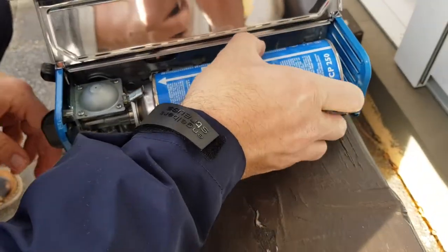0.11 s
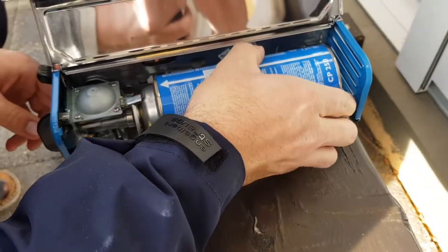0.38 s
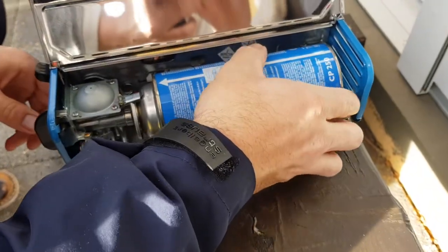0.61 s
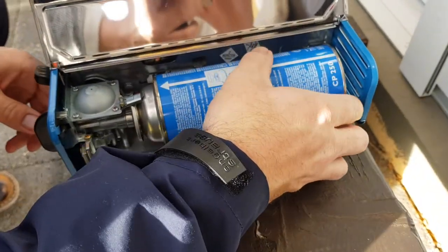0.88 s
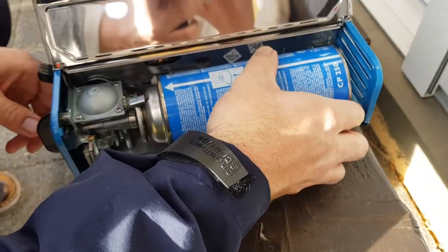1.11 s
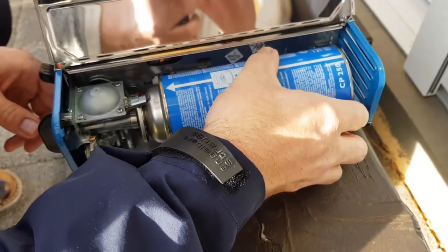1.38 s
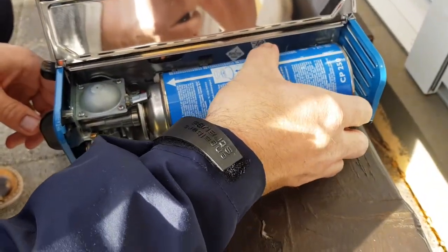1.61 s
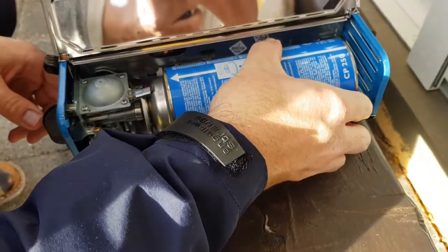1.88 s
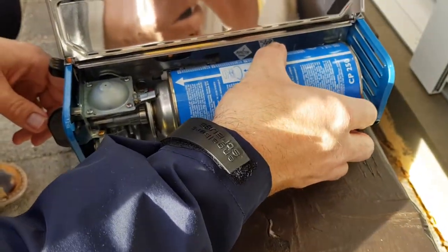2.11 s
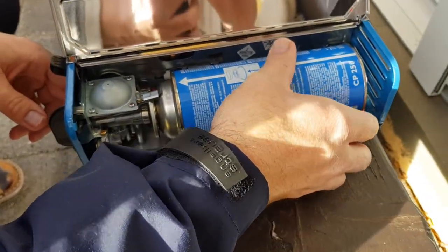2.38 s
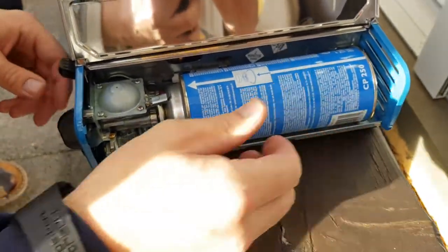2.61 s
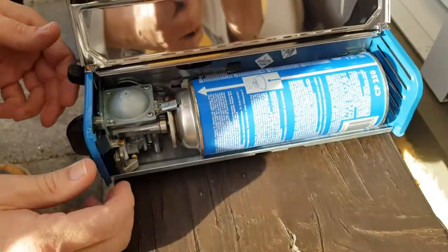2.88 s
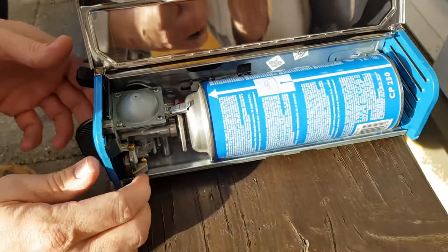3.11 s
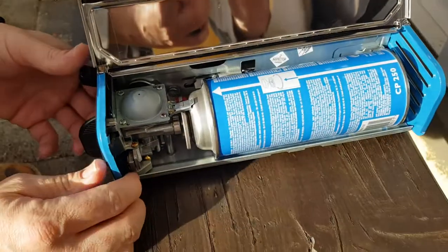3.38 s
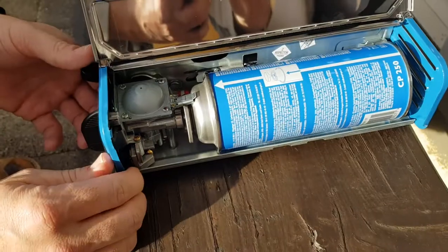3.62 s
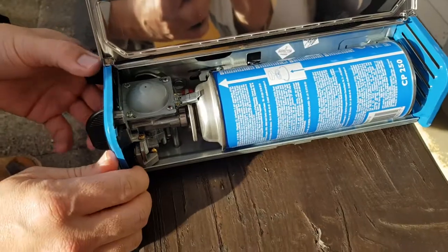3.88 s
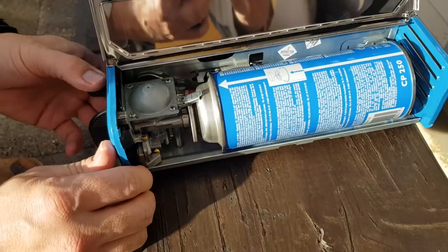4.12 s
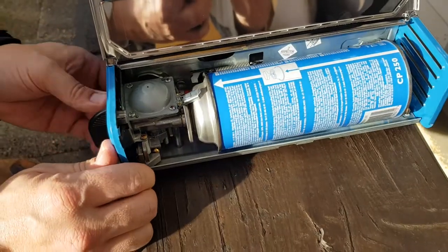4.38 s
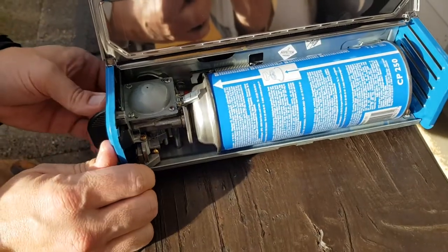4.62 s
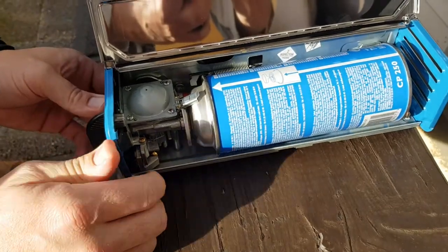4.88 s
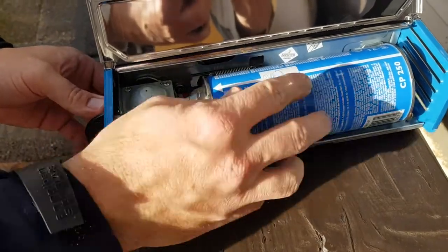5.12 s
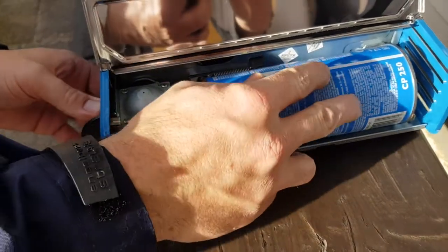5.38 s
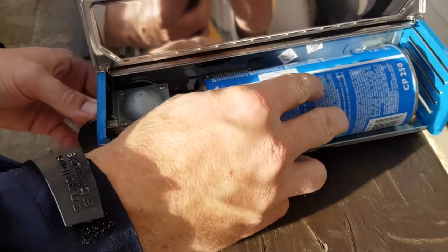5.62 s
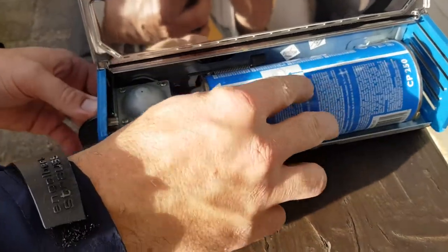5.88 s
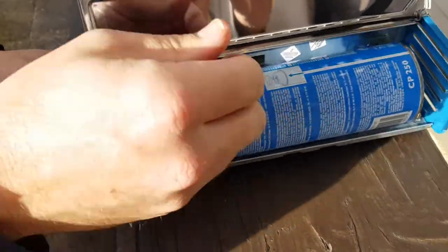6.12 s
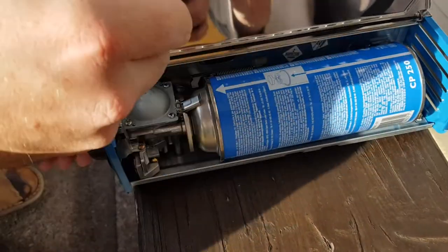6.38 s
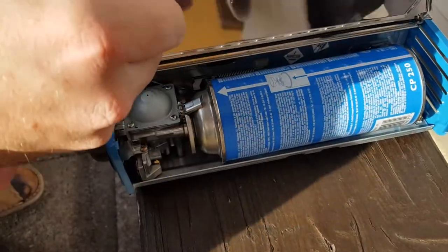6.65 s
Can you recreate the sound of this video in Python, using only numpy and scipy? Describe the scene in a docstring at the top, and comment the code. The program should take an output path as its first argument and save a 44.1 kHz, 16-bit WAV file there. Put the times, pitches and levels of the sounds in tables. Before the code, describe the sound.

A gas can clicks and knocks in a thin metal stove housing outdoors, a brief squeak, cloth rustling, and wind buffeting the microphone.

```python
"""Outdoors, close to a camping stove: a gas cartridge knocks in its sheet-metal housing, then a lever locks it.
Bursts of noise clatter plus ringing modes sound can and housing; a stick-slip tone squeaks, and scrapes and
a shifting grip are noise shaped by the metal's modes. A jacket sleeve, two layers of cloth noise, leads on the left.
Low noise in gusts buffets the two spaced microphone ports, each in its own way, over a distant hush."""
import sys
import numpy as np
from scipy import signal
from scipy.fft import rfft, irfft, next_fast_len
from scipy.io import wavfile
from scipy.ndimage import uniform_filter1d, map_coordinates

SR = 44100
rng = np.random.default_rng(int(sys.argv[2]) if len(sys.argv) > 2 else 0)


def ratio(d):
    """dB to gain"""
    e = np.asarray(d, float) / 20
    return 10 ** e


def put_to_file(sound):
    """Save the sound as 16-bit audio at rate SR, in the file named by the first command-line argument."""
    columns = np.atleast_2d(sound).T  # one column per channel
    safe = np.clip(columns, -1, 1)
    whole_steps = np.round(safe * 32767)
    wavfile.write(sys.argv[1], SR, whole_steps.astype(np.int16))


N = 298116

# ringing modes of the gas can: (frequency [Hz], relative level [dB], typical t60 [s])
CAN_MODES = [(518.4, -4.5, .3), (616, -4, 0.42), (786, -15, 0.19), (1330, -8.5, 0.53), (1364, -13.5, .4),
             (2042, 2, 0.05), (2290, -3, 0.13), (2800, -2.5, 0.14), (3300, -7, 0.11), (4630, -14, 0.06),
             (7960, -4, 0.069)]
# ringing modes of the sheet-metal housing: (frequency [Hz], relative level [dB], typical t60 [s])
HOUSING_MODES = [(398, -5.5, 0.52), (500, -0.5, 0.12), (807, -13.5, 0.43), (907, -8.5, 0.66),
                 (1128, 0, 0.5), (1193, -3.5, 0.3), (1303, -7, 0.61), (1242, -5.5, 0.24), (1714, 0, 0.15),
                 (2179, -8, 0.14), (2660, -10, 0.041), (5200, -4.5, 0.042), (5900, -5.5, .08),
                 (6542, -1.5, 0.054)]
# dip and peak of the microphone ports: (frequency [Hz], gain [dB])
PORT_RESPONSE = [(6000, 0), (9000, -2.5), (11000, 2.5), (13200, 9), (15800, 0.5)]
PORT_GAP = 19 / 44100  # travel time between the ports, s


def unit(x):
    """Bring to rms 1."""
    return x / np.sqrt(np.mean(x ** 2) + 1e-20)


def along(points, hz):
    """(Hz, value) points read on a log axis."""
    f, v = np.transpose(points)
    return np.interp(np.log(hz + 1), np.log(f + 1), v)


def curves(rows):
    """One value per sample for each column after the time."""
    s, *cols = np.transpose(rows)
    return [np.interp(np.arange(N) / SR, s, c) for c in cols]


def wobble(rate):
    """A smooth random curve, rate knots a second."""
    return map_coordinates(rng.standard_normal(int(N * rate / SR) + 4), [np.arange(N) * rate / SR])


def filtered(x, response):
    """x filtered by a complex response of frequency."""
    m = next_fast_len(N + 8192)
    hz = np.fft.rfftfreq(m, 1 / SR)
    return irfft(rfft(x, m) * response(hz), m)[..., :N]


def pair(gain, alike, lead=0):
    """Stereo noise of rms 1 with a colour, a likeness of the sides and a lead of the left side in s."""
    turn = lambda hz: np.arccos(np.clip(alike(hz), 0, 1)) / 2
    spread = lambda hz: gain(hz) * [np.cos(turn(hz)), np.sin(turn(hz))]
    mid, side = filtered(rng.standard_normal((2, N)), spread)
    shift = lambda hz: np.exp(1j * np.pi * lead * np.outer([1, -1], hz))
    return unit(filtered(np.array([mid + side, mid - side]), shift))


def modal(f, lift, width):
    """Noise in the metal is lifted near the modes of can and housing; the peaks widen with pitch."""
    return 1 + sum(lift * ratio(db) / (1 + ((f - hz) / (width * hz)) ** 2)
                   for hz, db, t60 in CAN_MODES + HOUSING_MODES)


def crowded(spacing_hz):
    """A random curve over frequency for the countless close modes of thin plates."""
    knots = rng.standard_normal(int(SR / 2 / spacing_hz) + 4)
    return lambda f: map_coordinates(knots, [f / spacing_hz])


def air():
    """A smooth, distant hush: steady noise, separate at each port."""
    # far outdoor hush: (frequency [Hz], density [dB per Hz])
    hush = [(150, -97), (300, -99), (1000, -102), (2500, -113), (3600, -118), (5500, -114), (8500, -114),
            (13000, -108), (16000, -110)]
    per_hz_db = np.log10(SR / 2) * 10  # the white noise spreads over SR / 2
    return filtered(rng.standard_normal((2, N)), lambda f: ratio(along(hush, f) + per_hz_db))


def wind():
    """Eddies thump each port in lumps, partly pushing one while pulling the other; the strongest turn sharp."""
    # wind between the gusts: (time [s], level [dB], left over right [dB])
    breeze = [(0, -56, -8), (.13, -48, 21), (.24, -44, 6), (.7, -53, -2), (1.05, -54.5, 5.5),
              (1.3, -46, -28), (1.65, -51, -27), (2.3, -46.5, -13), (2.6, -52, -17), (2.86, -55, -25),
              (3.25, -47, -2), (3.44, -50, 21), (3.82, -49.5, -6.5), (4.15, -54.5, -14), (4.6, -54, -6),
              (4.9, -49.5, -1), (5, -62, -26), (5.2, -51.5, -9.5), (5.72, -42, 5.5), (5.88, -67, -15),
              (6.25, -51, -27), (6.42, -45, -27.5), (6.6, -56, -5), (6.76, -63, -21)]
    # gusts that thump the ports: (time [s], peak level [dB], half length [s], left over right [dB])
    gust_list = [(0.329, -31, 0.041, -2.5), (0.463, -42, 0.07, -3), (0.628, -33.5, .05, 2.5),
                 (0.766, -20, 0.012, 0), (0.902, -41, 0.07, -18), (1.193, -42, 0.073, -15),
                 (1.37, -44, 0.062, 11), (1.524, -35, .04, -2), (1.735, -37.5, 0.025, -4),
                 (1.854, -37.5, 0.059, -15), (1.914, -33.5, 0.017, 7), (1.992, -37.5, .04, 1),
                 (2.139, -30.5, 0.036, -15), (2.213, -34, 0.065, -3), (2.507, -38.5, 0.046, -2.5),
                 (2.702, -50, 0.041, 3), (3.114, -32, 0.078, -2.5), (3.353, -37.5, 0.036, -8),
                 (3.668, -33.5, 0.052, -1), (3.915, -29, 0.02, 15), (3.98, -31, 0.046, -0.5),
                 (4.31, -40.5, 0.037, 2.5), (5.074, -39, 0.049, -11.5), (5.326, -39, 0.036, -2),
                 (5.559, -35, 0.088, -1), (6.04, -39.5, 0.078, -25.5), (6.183, -41.5, .04, -8),
                 (6.343, -33, 0.016, -8.5), (6.497, -29.5, 0.046, -5.5), (6.681, -40, 0.028, -2)]
    # colour of the buffeting: (frequency [Hz], relative level [dB])
    buffet = [(15, -36), (30, -14), (45, 0.5), (62, 1), (100, -4.5), (150, -14), (250, -28), (500, -47.5),
              (1000, -75.5)]
    fall_db = 9  # fall one half length from the gust's peak
    t = np.arange(0, N + 64, 64) / SR
    breeze_db, lean_db = curves(breeze)
    power = lambda db, pan_db: ratio(2 * db) / (1 + ratio(2 * np.array([[-1], [1]]) * pan_db))
    gusts = sum(power(db - fall_db * np.abs(t - s) / half, pan_db) for s, db, half, pan_db in gust_list)
    gusts = [np.interp(np.arange(N) / SR, t, port) for port in gusts]
    steady = power(breeze_db + 2.5 * wobble(7.5), lean_db + 6 * wobble(8.1))
    force = np.sqrt(steady + gusts)

    lumps = ratio(4.5 * np.array([wobble(25), wobble(25)]))
    eddies = rng.standard_normal((2, N))
    push = unit(filtered(lumps * (eddies - 0.14 * eddies[::-1]), lambda f: ratio(along(buffet, f))))
    slow = uniform_filter1d(uniform_filter1d(push ** 2, size=4000), size=4000)
    push = unit(push / (np.abs(slow) + .05) ** 0.97)  # lumps stay, the slower drift is left to the gusts
    edge = unit(filtered(push * np.abs(push), lambda f: f / (f + 300)))
    sharp = unit(push + 0.042 * edge)
    flutter_level = ratio(-23.5 + 7 * np.array([wobble(42), wobble(45)]))
    flutter = flutter_level * pair(lambda f: 1 / (1 + ((f - 260) / 130) ** 2), lambda f: 0 * f)
    return force * (sharp + flutter)


def sleeve():
    """Cloth rubs on cloth on the left; fine grain is shared, slower folds differ between the layers."""
    # speed of the sleeve, as the level of its fine hiss: (time [s], level [dB])
    speed = [(0, -54.5), (.3, -56.5), (.8, -62), (1, -54.5), (1.22, -62), (1.6, -66.5), (2.06, -74),
             (2.1, -62), (2.15, -65), (2.27, -55.5), (2.32, -56.5), (2.48, -51), (2.52, -45), (2.65, -37.5),
             (2.72, -40.5), (2.76, -39.5), (2.82, -46.5), (2.94, -47), (3, -40), (3.24, -39), (3.4, -44.5),
             (3.67, -52), (4, -60), (4.3, -58.5), (4.7, -67), (4.82, -60), (4.95, -45.5), (5.03, -53),
             (5.08, -50.5), (5.21, -62), (5.8, -70), (5.98, -60.5), (6.15, -59.5), (6.41, -61.5),
             (6.56, -56.5), (6.69, -52), (6.76, -56.5)]
    # colour of the fine hiss: (frequency [Hz], relative level [dB])
    fine_colour = [(5000, -26), (9000, -16.5), (11000, -10), (13500, -2), (15800, -8.5)]
    # colour of the coarse rustle: (frequency [Hz], relative level [dB])
    coarse_colour = [(150, -19), (350, 4), (900, 5), (2500, 0.5), (3600, 1), (4700, 1), (7500, 2),
                     (9000, -10), (12000, -15.5), (16000, -26.5)]
    # likeness of left and right: (frequency [Hz], correlation [0 to 1])
    likeness = [(400, 0.93), (3000, 0.33), (7000, 0.47), (12000, 0.05)]
    # the coarse rustle at a fast stroke; it swings wider than the hiss
    coarse_at_fast_db, coarse_grows, fast_db = -42, 1.118, -38
    # below this speed the folds stop rubbing: further dB lost for each dB slower
    slow_db, coarse_dies = -60, 2
    fine_db, = curves(speed)
    fine_db = fine_db + 1.2 * wobble(12)
    coarse_db = coarse_at_fast_db + coarse_grows * (fine_db - fast_db)
    coarse_db = coarse_db - coarse_dies * np.maximum(slow_db - fine_db, 0)
    grain = 0.56 * wobble(400) + .7 * wobble(30)
    alike = lambda f: along(likeness, f)
    hiss = pair(lambda f: ratio(along(fine_colour, f)), alike, lead=PORT_GAP)
    rustle = pair(lambda f: ratio(along(coarse_colour, f)), alike, lead=PORT_GAP)
    fine = ratio(fine_db + grain + .8 * wobble(39)) * hiss
    coarse = ratio(coarse_db + grain + 0.53 * wobble(17)) * rustle
    return fine + coarse


def grip():
    """Soft, lumpy rubbing sounded through the low modes of the can and the lowest of the housing."""
    # fingers shifting on the metal: (time [s], level [dB])
    fingers = [(0, -56.5), (.36, -52.5), (.58, -70.5), (.98, -55), (1.2, -76), (2.3, -100), (2.5, -54.5),
               (2.65, -72), (3.6, -100), (3.92, -60.5), (4.3, -58.5), (4.65, -77.5), (5.3, -102),
               (6.5, -74), (6.76, -62)]
    low_modes = CAN_MODES[:5] + HOUSING_MODES[:1]
    broad = lambda f: 0.1 / (1 + (f / 1500) ** 4) / (1 + (300 / (f + 1)) ** 4)
    body = lambda f: broad(f) + sum(ratio(db) / (1 + ((f - hz) / 45) ** 2) for hz, db, t60 in low_modes)
    level_db = curves(fingers)[0] + 2.2 * wobble(43) + 1.9 * wobble(180)
    return ratio(level_db) * pair(body, lambda f: 0.23 + 0 * f)


def scrapes():
    """Grainy friction under a stroke that swells and falls to a trace; noise is lifted at the metal's modes."""
    # parts sliding on each other:
    # (start [s], loudest [s], end [s], level [dB], lowest frequency [Hz], highest frequency [Hz])
    slides = [(0.777, 0.795, 2.7, -70, 500, 1480), (1.099, 1.155, 1.222, -52.5, 3010, 5260),
              (1.13, 1.185, 1.246, -59.5, 1500, 2600), (4.156, 4.235, 4.24, -34.5, 4400, 14860),
              (4.196, 4.23, 4.29, -63.5, 400, 2607), (4.243, 4.256, 4.275, -49.5, 3518, 8000)]
    t = np.arange(N) / SR
    out = np.zeros((2, N))
    for start, top, end, db, lo_hz, hi_hz in slides:
        stroke = np.interp(t, [start, start + .003, top, end], [0.0048, .22, 0.91, 0.017])
        limits = lambda f: np.sqrt((1 + (lo_hz / (f + 1)) ** 8) * (1 + (f / hi_hz) ** 8))
        band = lambda f: modal(f, 0.71, 0.018) * ratio(along(PORT_RESPONSE, f)) / limits(f)
        grains = ratio(db + 1.2 * wobble(60) + 2.0 * wobble(280) + 1.4 * wobble(1300))
        out += grains * stroke * pair(band, lambda f: 0.11 + 0 * f)
    return out


def squeak():
    """A short uneven stick-slip: a rough tone with overtones that fade faster."""
    # metal slips on metal: (time [s], mean slip rate [Hz], base level [dB], t60 of the fundamental [s])
    slips = [(.995, 2070, -35.5, 0.17)]
    t = np.arange(N) / SR
    out = np.zeros(N)
    for s, hz, db, t60 in slips:
        since = np.maximum(t - s, 0)
        turn = 2 * np.pi * np.cumsum(hz * (1 + 0.0315 * wobble(270))) / SR
        for k, level in enumerate([6.0, 6.5, -1, -12]):  # dB of each partial
            onset = 1 - np.exp(-since * (k + 1) ** 2 / 0.0083)
            fade = ratio(db + level + 2.5 * wobble(160) - 60 * since * (1 + 1.2 * k) / t60)
            out += onset * fade * np.sin((k + 1) * turn)
    return np.array([out, np.roll(out, round(PORT_GAP * SR))])  # the right port hears it later


def ringing(modes, t):
    """One burst on a set of modes: new strengths and decays, loose joints blurring them, the high ones most."""
    hz, db, t60 = np.transpose(modes)[:, :, None]
    size, part, damp = rng.standard_normal((3, len(modes), 1))
    flutter = uniform_filter1d(rng.standard_normal((len(modes), len(t))), size=400, axis=1)
    flutter = flutter * 20 * np.clip(hz / 2500, .55, 1) ** 2
    # phases part between the ports
    side = np.array([1, -1])[:, None, None] * part * np.minimum(hz / 2500, 1.5)
    fade = ratio(db + 2 * size + 4 * flutter - 60 * t / (t60 * np.exp(.12 * damp)))
    return np.sum(fade * np.sin(2 * np.pi * hz * t + side + .9 * flutter), axis=1)


def metal_bursts():
    """Bursts of clatter die band by band and ring the can and the housing; sudden ones also crack."""
    # bursts of metal sound, from sharp knocks to soft swells: (time [s], strength [dB], rise [ms],
    # knock at 600 Hz [dB], edge at 11 kHz [dB], can ring over housing ring [dB])
    bursts = [(0.0753, -42, 6, -12, -6, -4), (0.162, -25.5, 2, -7, -9.5, 15),
              (0.2074, -17, 3, -12.5, -13.5, 0.5), (0.2877, -45.5, 3, 3, -20, -13),
              (0.3171, -12, .4, -16.5, -14, 10.5), (0.7782, -51, 5.5, -6, 0.5, -11),
              (.943, -49.5, 2, 4, -4, 6), (0.9515, -20.5, 2, -12, -6, 21), (.975, -30.5, 4.5, -30, -24, -6),
              (0.996, -34.5, 2, -40, -14, 1), (1.445, -54.5, 13, -6, 3, 7), (1.476, -35, 1.4, -4, 1, 8.5),
              (1.505, -42.5, 2, -5, -6, -5), (3.492, -25.5, .4, -15, -7.5, -4.5),
              (3.5419, -35, 2, -6.5, -9.5, 11), (3.86, -48, 3, -10, -8, -3),
              (3.9025, -31, 3, -6.5, -20.5, 6.5), (3.93, -25, .5, -9, -5.5, 1),
              (4.164, -49.5, 3, -20, 1, -1), (4.2898, -21.5, 3, -13.5, -6.5, -0.5),
              (4.3287, -30, 1.2, -8.5, 6.5, -2), (4.3571, -9, 1.5, -21, -2.5, -5.5),
              (4.628, -56, 6, 0, -15.5, -3), (5.2606, -29, 1, -29, -4, 5),
              (5.2793, -21, 1.1, -12.5, -24, 13.5), (5.7551, -56, 4, -3, -28, -4),
              (6.6327, -37.5, 2, -0.5, -3, 17), (6.646, -36.5, 8, -8.5, -37, -9)]
    # dense clatter of the thin plates, by band: (frequency [Hz], level [dB], share of the base t60 [ratio])
    plates = [(302, -3, 2.2), (530, 7.5, 1.94), (1090, 0.5, 1.7), (2190, 3, 1.03), (4360, 1.5, 0.85),
              (8000, 9, 0.64), (12800, 12, 0.52)]
    usual_db = -30  # strength of a middling burst
    base_t60 = .16  # s, scaled per band and per decay
    ring_db, ring_lags = -24, 0.34  # ringing under the peak; dB it falls behind for each dB of strength
    bite_base_db, bite_follows = 6.5, 0.5  # the bite at 4500 Hz follows the edge
    t = np.arange(SR // 2) / SR
    hz, db, share = np.transpose(plates)
    swell, rings = np.zeros((len(hz), N + SR)), np.zeros((2, N + SR))
    for s, peak_db, rise_ms, knock_db, edge_db, lean_db in bursts:
        at = slice(round(s * SR), round(s * SR) + len(t))
        onset = 1 - np.exp(-t / max(rise_ms / 1000, 1e-4))
        bite_db = bite_base_db + bite_follows * edge_db
        colour = db + along([(600, knock_db), (2300, 0), (4500, bite_db), (11000, edge_db)], hz)
        crack = ratio(0.5 - 60 * t / 0.0027)  # only a sudden rise lets the crack through
        early = ratio(-60 * t / (0.53 * base_t60 * share[:, None]))
        # the plates keep shaking, weaker and longer
        shiver = ratio(-12.0 - 60 * t / (1.65 * base_t60 * share[:, None]))
        swell[:, at] += ratio(peak_db - 13 + colour)[:, None] * onset * (crack + early + shiver)
        both_db = ring_db - ring_lags * (peak_db - usual_db)
        can_db, housing_db = both_db + np.array([lean_db, -lean_db]) / 2
        ring = ratio(can_db) * ringing(CAN_MODES, t) + ratio(housing_db) * ringing(HOUSING_MODES, t)
        rings[:, at] += ratio(peak_db) * onset * ring

    edges = np.r_[150, hz, 20000]
    strength, turn = crowded(spacing_hz=89.03), crowded(spacing_hz=500)
    metal = lambda f: modal(f, 0.78, 0.011) * ratio(6.8 * np.tanh(strength(f)))
    # each part of the plates reaches the two ports at its own phase, the more so as wavelengths shrink
    parting = lambda f: np.exp(1j * np.outer([1, -1], turn(f) * np.minimum(f / 2800, 1.2)))
    clatter = np.zeros((2, N))
    for k in range(len(hz)):
        share_of_power = lambda f: along([(edges[k], 0), (edges[k + 1], 1), (edges[k + 2], 0)], f)
        band = pair(lambda f: metal(f) * np.sqrt(share_of_power(f)), lambda f: 0.75 + 0 * f)
        clatter += filtered(band, parting) * swell[k, :N]
    rattle = ratio(1.4 * wobble(300) + 1.5 * wobble(900))  # loose parts chatter within each burst
    return rings[:, :N] + filtered(rattle * clatter, lambda f: ratio(along(PORT_RESPONSE, f)))


def scene():
    """All sources at the two ports."""
    return air() + wind() + sleeve() + grip() + scrapes() + squeak() + metal_bursts()


def roll_off(x):
    """The treble ends steeply here."""
    return signal.sosfilt(signal.butter(12, 16800, fs=SR, output="sos"), x)


def record(dry):
    """Band limit, then soft clipping at full scale."""
    top_hz = 15850
    x = filtered(dry, lambda hz: hz < top_hz)
    mix = x / (1 + np.abs(x) ** 8) ** (1 / 8)
    return roll_off(mix)


dry = scene()
out = record(dry)
put_to_file(out)
```